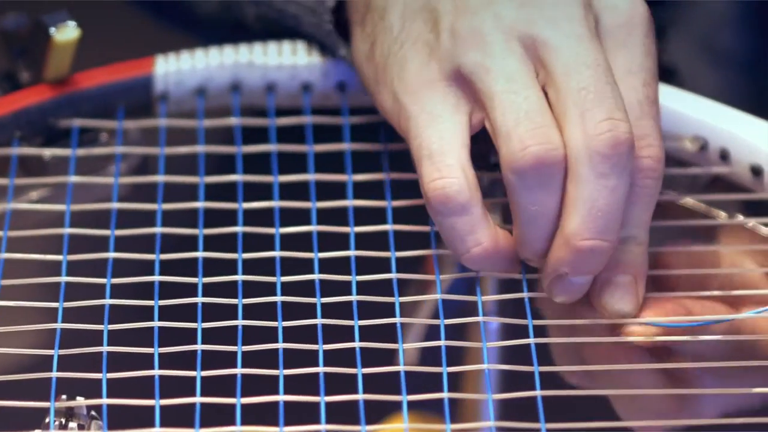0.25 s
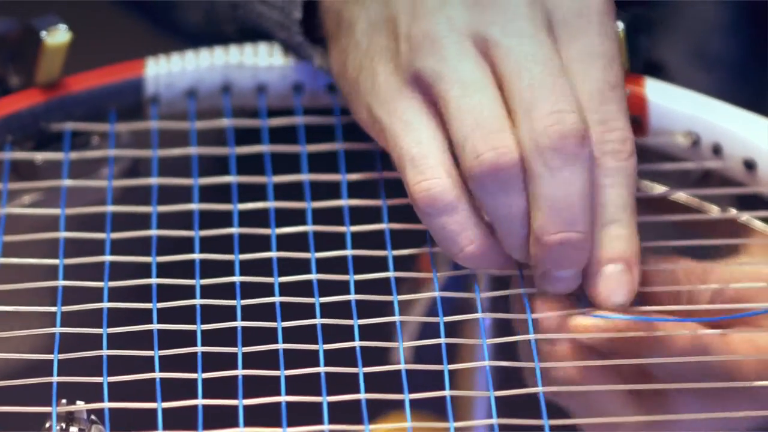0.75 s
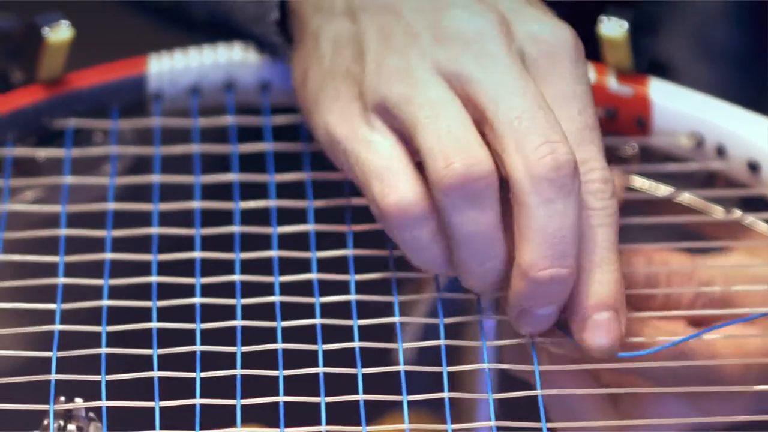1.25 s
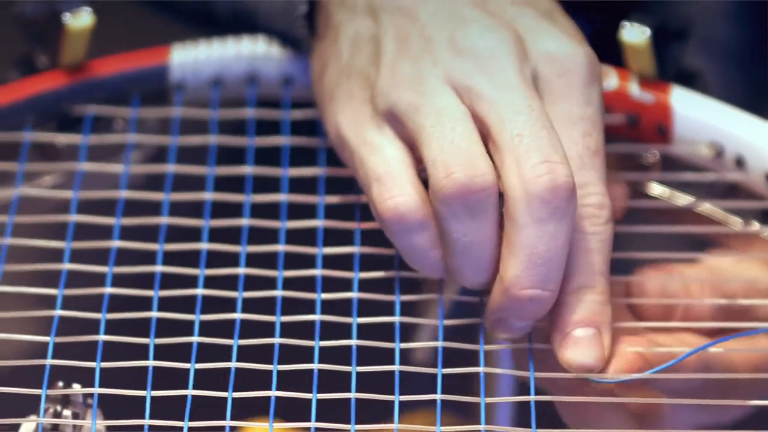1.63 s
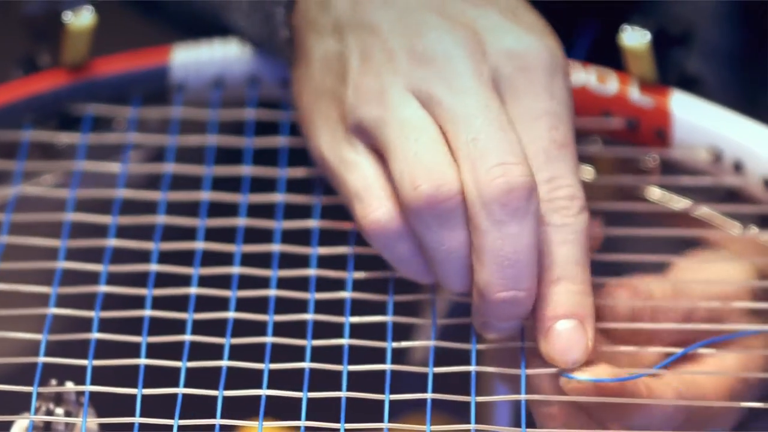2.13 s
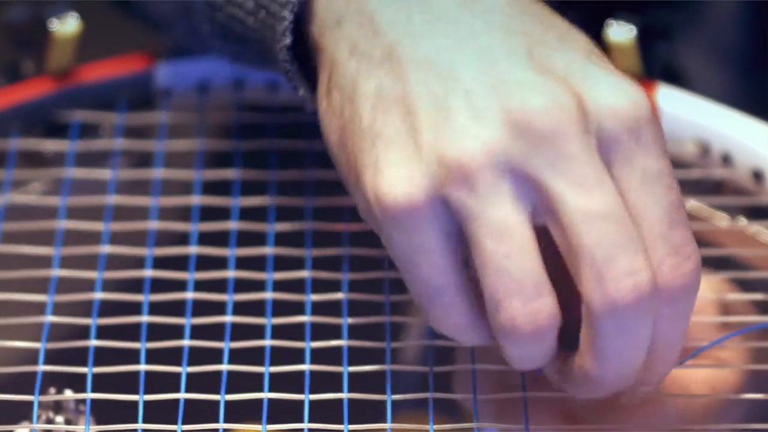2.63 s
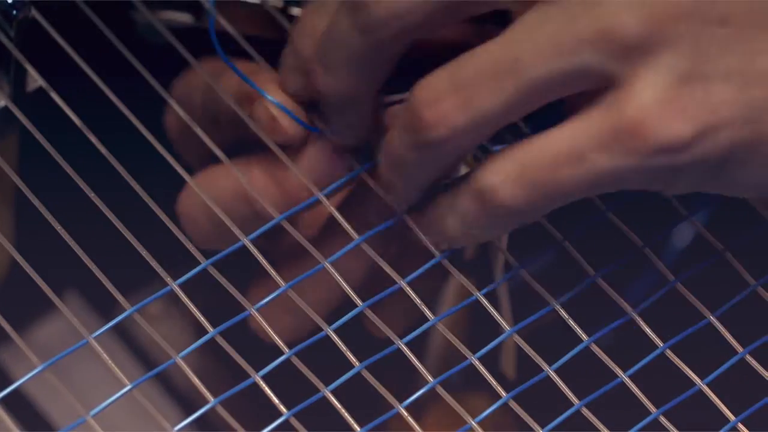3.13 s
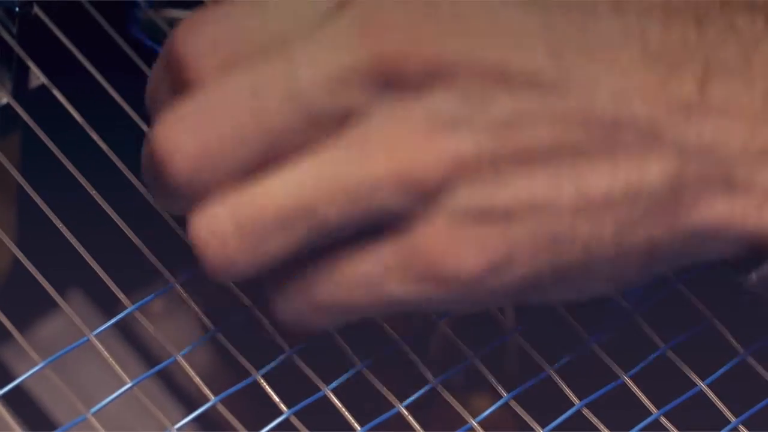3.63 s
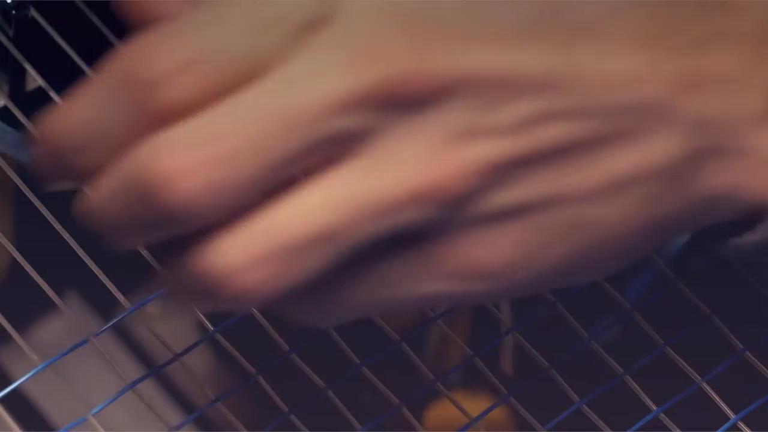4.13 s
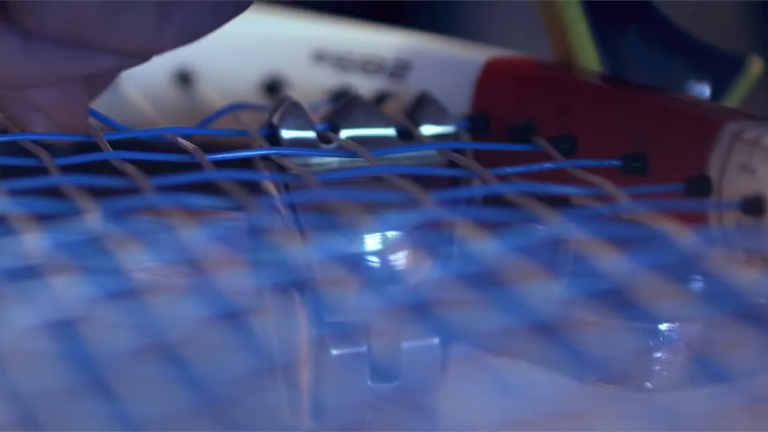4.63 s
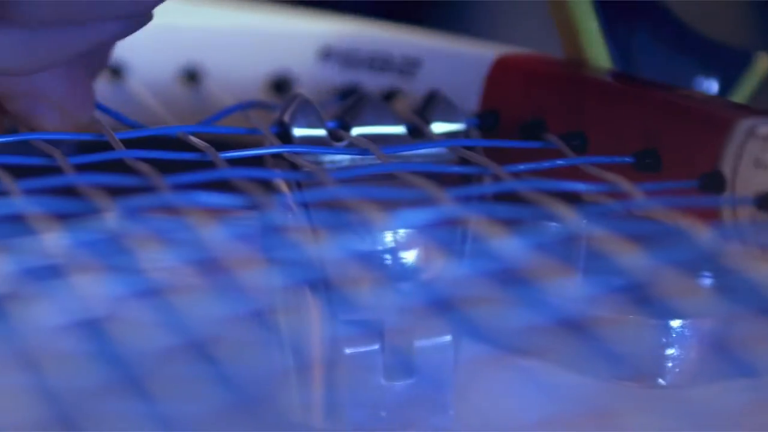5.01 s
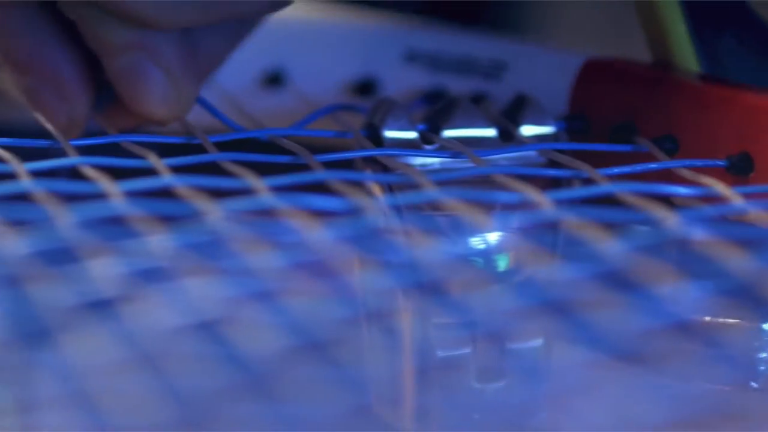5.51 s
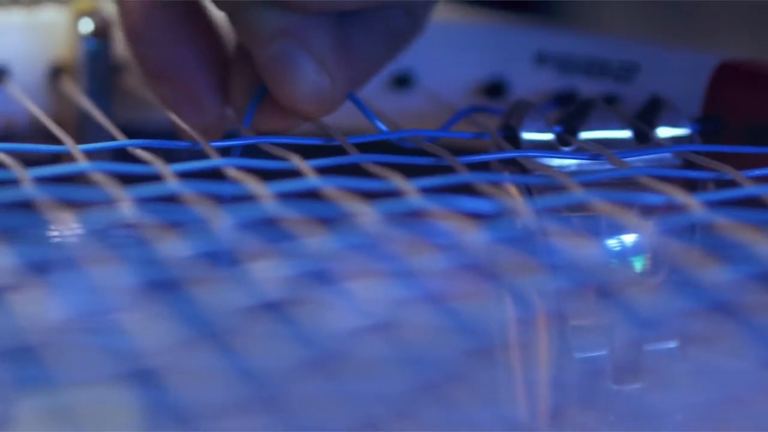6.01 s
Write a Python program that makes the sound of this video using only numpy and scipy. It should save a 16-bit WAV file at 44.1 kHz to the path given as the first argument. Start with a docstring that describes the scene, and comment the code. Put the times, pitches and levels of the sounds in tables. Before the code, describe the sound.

A tennis racquet is being strung by hand in a small, live room, heard from close by. The string snaps sharply twice as it slips over tight strings, between soft finger thuds. A heavier bump brings faint, damped string notes and light ticks, then another bright snap. Near the end a brief creak leads into a loud, resonant clack of a metal clamp. Faint rubbing, machine hum and hiss lie underneath.

```python
"""Stringing a tennis racquet

In a small, live room the cross string slips over the tight mains; each sharp snap excites the frame's
modes. Fingers rub and bump the string bed, which rings briefly, and the loose string end ticks.
Near the end the string creaks by stick-slip friction and a clamp shuts with a loud, resonant clack.
The stringing machine hums faintly over the room's hiss and rumble."""
import sys
import numpy as np
from scipy import signal
from scipy.fft import rfft, irfft, next_fast_len
from scipy.io import wavfile
from scipy.ndimage import uniform_filter1d, map_coordinates

SR = 44100
rng = np.random.default_rng(int(sys.argv[2]) if len(sys.argv) > 2 else 0)


def generate_wav(signal):
    """Clip the signal to [-1, 1] and save it as 16-bit WAV at the path in sys.argv[1]."""
    frames = np.transpose(np.atleast_2d(signal))
    scaled = np.clip(frames, -1, 1) * 32767
    pcm = np.round(scaled).astype(np.int16)
    wavfile.write(sys.argv[1], SR, pcm)


N = 275911

# Slips over a main: (time [s], level [dB], tilt [dB/octave], cut-off [Hz], longitudinal mode spacing [Hz],
# mode depth [dB], ring frequency [Hz], ring lift [dB], second slip [dB], room [dB])
SNAPS = [(0.3467, -14, 1.07, 10400, 2300, 2, 1340, 6.5, -7.5, 4.5),
         (1.7139, -6.5, 2, 9800, 1736, 4, 1380, 6, -4.5, 7),
         (3.821, -14, 3.36, 15400, 1102, 1, 5480, 6.5, 3.5, 4),
         (4.1173, -27, -.5, 13000, 1700, 0.5, 6440, 4, -11, 7.5)]
# Spectrum of the string's jolt: (frequency [Hz], gain [dB])
JOLT = [(230, 1), (520, 1), (700, -1.5), (1300, -5.5), (1650, -12), (2200, -6), (4200, 1), (7000, 2),
        (10000, 1)]
# Direct path to the listener: (frequency [Hz], gain [dB])
DIRECT_PATH = [(1000, 1.5), (4000, -2), (9000, 2.5)]
# Overall colour shared by the snaps, with a notch near 8 kHz: (frequency [Hz], gain [dB])
SNAP_COLOUR = [(60, -12.5), (240, 5), (400, -5.5), (590, 7), (790, -16.5), (1150, 0.5), (1700, 4),
               (2150, 1), (3800, -0.5), (6700, -3.5), (7900, -6), (8600, -2), (9800, 3.5), (15500, -5)]
# Frame resonances: (frequency [Hz], width [Hz], lift [dB])
FRAME_MODES = [(234, 14, 8.5), (520, 59, 5.5), (991, 42, 13), (1210, 44, 11.5), (1390, 50, 10.5),
               (1830, 55, -1), (2090, 46, 3), (2670, 93, 7.5), (2945, 49, 1)]

def snaps(lag_s=0.0062, ring_width_hz=130):
    """Impulse excitation: the string slips twice, driving its longitudinal modes and the frame."""
    out = np.zeros((2, N))
    for s, db, tilt, cutoff_hz, spacing_hz, depth_db, ring_hz, ring_db, second_db, room_db in SNAPS:
        slip = crack(t60=0.022, spread=0.48)
        add(slip, lag_s, amp(second_db) * crack(t60=0.0103, spread=1.0))
        direct = shaped(unit_energy(slip), DIRECT_PATH)
        heard = unit_energy(direct + amp(room_db) * room())
        ripple = dense_modes(spacing_hz=70, depth_db=2.8, full_hz=2500)
        modes = [*FRAME_MODES, (ring_hz, ring_width_hz, ring_db)]

        def colour(hz):
            rolloff = 10 * np.log10(1 + (hz / cutoff_hz) ** 9)
            jolt = along(JOLT, hz) + tilt * np.log2((hz + 100) / 4000) - rolloff
            ringing = longitudinal_modes(hz, spacing_hz, depth_db) + resonances(modes, hz) + ripple(hz)
            return jolt + along(SNAP_COLOUR, hz) + ringing
        add(out, s, amp(db) * coloured(heard, colour))
    return out

def longitudinal_modes(hz, spacing_hz, depth_db):
    """Standing waves along a short span of string give evenly spaced peaks, in dB."""
    peaks = ((1 - np.sin(2 * np.pi * hz / spacing_hz)) / 2) ** 2
    return depth_db * (2 * peaks - 1)

# The clamp catches, slams and rebounds: (time [s], body level [dB], treble level [dB])
CLACKS = [(5.4691, -14, -28.5), (5.4908, 1, 1), (5.512, -8.5, -4)]
# Spectrum of the clean first push: (frequency [Hz], gain [dB])
STRIKE = [(310, 6), (450, 6), (620, 4), (800, 4), (1500, 2.5), (2800, -2.5), (5000, -7.5)]
# Response of the clamp on its base: (frequency [Hz], gain [dB])
CLAMP = [(50, -15), (200, 5), (320, 8), (480, 15), (780, 5.5), (1450, 17), (1700, 13), (3000, 10.5),
         (3800, 3), (5300, 0.5), (5900, -3), (7800, 2), (9000, 6.5), (12000, 6.5), (15000, -15)]
# Their resonances: (frequency [Hz], width [Hz], lift [dB])
CLAMP_MODES = [(313, 10, 16), (359, 10, 12), (437, 12, 8), (466, 10, 12), (520, 24, 5), (614, 11, 10),
               (842, 9, 15), (942, 16, 8), (1143, 12, 9), (1211, 15, 8), (1287, 26, 7), (1383, 14, 4),
               (1430, 16, 7), (1497, 16, 4), (1595, 14, 6), (1896, 20, 5), (2129, 12, 9), (2740, 24, 5),
               (2953, 20, 7), (3043, 20, 7), (3200, 24, 6), (4650, 50, 6), (5200, 110, 10), (6540, 36, 9),
               (7770, 40, 6), (8470, 110, 7), (8841, 22, 10), (8965, 22, 8), (9520, 50, 5), (11368, 30, 8)]
# Directivity: (frequency [Hz], leftward bias [dB])
CLAMP_SIDE = [(300, -0.5), (600, -2), (1200, 0), (2600, 1.8), (5000, 0)]

def clamp(strike_db=-7, chatter_db=-8, room_db=-4.5, pan_db=0.7):
    """Modal ringing after impact: each contact, a clean strike plus chatter, excites the same modes."""
    out, sides = np.zeros((2, N)), np.array([[1], [-1]])
    ripple = dense_modes(spacing_hz=35, depth_db=2.4, full_hz=3500)
    body = lambda hz: along(CLAMP, hz) + resonances(CLAMP_MODES, hz) + ripple(hz)
    radiated = lambda hz: body(hz) + sides * along(CLAMP_SIDE, hz)
    strike = shaped(bending_pulse(delay_s=0.00219), STRIKE)
    for s, body_db, treble_db in CLACKS:
        contact = amp(strike_db) * strike + amp(chatter_db) * crack(t60=0.062, spread=0.58)
        heard = amp(sides * pan_db) * contact + amp(room_db) * room()
        hardness = [(900, body_db), (8000, treble_db)]
        add(out, s, coloured(heard, lambda hz: radiated(hz) + along(hardness, hz)))
    return out

def bending_pulse(delay_s):
    """Dispersion of bending waves in metal: the highs arrive first, 1 kHz after delay_s."""
    hz = np.fft.rfftfreq(SR, 1 / SR)
    return irfft(np.exp(-4j * np.pi * delay_s * np.sqrt(hz * 1000)), SR)

# Finger contacts: (time [s], thud level [dB], slap level [dB], room in the thud [dB])
BUMPS = [(0.157, -10.5, -46, -34), (0.885, -17.5, -51, 3), (1.412, -19.5, -58, 0.5),
         (2.474, 0.5, -18.5, -2.5), (2.548, -20, -50, -1), (2.683, -15.5, -38, 0), (2.832, -16, -33.5, -7)]
# Slap on the strings: (frequency [Hz], gain [dB])
SLAP = [(150, -26), (500, 9), (900, -0.5), (1300, -3.5), (2000, -54), (5000, -43)]
# Thud through the frame: (frequency [Hz], gain [dB])
THUD = [(40, -17), (100, -5.5), (170, -6.5), (310, 2), (420, -14.5), (600, -31), (1200, -62), (3000, -48)]

def bumps(lead_s=0.0043, slap_room_db=-16.5):
    """Soft impact favours low frequencies: a fingertip slaps the strings, then the frame thuds."""
    out = np.zeros((2, N))
    for s, thud_db, slap_db, room_db in BUMPS:
        slap = crack(t60=0.082, spread=0.44) + amp(slap_room_db) * room()
        thud = crack(t60=0.043, spread=0.9) + amp(room_db) * room()
        add(out, s - lead_s, amp(slap_db) * shaped(slap, SLAP))
        add(out, s, amp(thud_db) * shaped(thud, THUD))
    return out

# Spectrum of the creak: (frequency [Hz], gain [dB])
CREAK = [(300, -4), (1100, 3), (2500, -4), (4700, -4.5), (5600, -27.5), (15000, -28.5)]
# Resonances of the clamped string: (frequency [Hz], width [Hz], lift [dB])
CREAK_MODES = [(1240, 53, 16), (1470, 70, 4), (1900, 55, 15), (2405, 50, 13), (3040, 90, 11.5),
               (3900, 70, 9.5), (4600, 60, 12)]

def creak(start_s=5.2487, level_db=-33, count=11, slips_per_s=205, loss_db=1.3, jitter=0.1, room_db=-3):
    """Stick-slip friction: a short run of uneven, fading jerks rings the clamped string."""
    out, run = np.zeros((2, N)), np.zeros((2, SR))
    for k, offset in enumerate(jitter * rng.standard_normal(count)):
        add(run, (k + offset) / slips_per_s, amp(-loss_db * k) * crack(t60=0.0071, spread=0.33))
    heard = unit_energy(run) + amp(room_db) * room()
    colour = lambda hz: along(CREAK, hz) + resonances(CREAK_MODES, hz)
    add(out, start_s, amp(level_db) * coloured(heard, colour))
    return out

# The weave passes a main: (time [s], level [dB], pitch [Hz])
PLUCKS = [(2.682, -56, 513), (2.916, -55, 473), (3.0736, -44, 465.6), (3.237, -49.5, 466),
          (3.394, -57.5, 474), (3.59, -53.5, 471), (4.425, -63, 609)]
# One string scuffs another: (frequency [Hz], gain [dB])
SCUFF = [(200, -2), (520, 7.5), (800, -6.5), (2300, -24.5), (3000, -11), (3800, -29), (12000, -47)]

def plucks(t60=0.12, attack_s=0.0038, room_db=-14, pan_db=-1.0, scuff_db=19):
    """Damped free vibration: with a soft scuff, the string bed sounds one note that the hand damps."""
    out, t = np.zeros((2, N)), np.arange(SR) / SR
    for s, db, hz in PLUCKS:
        envelope = amp(db - 60 * t / t60) * (1 - np.exp(-t / attack_s))
        ring = envelope * np.sin(2 * np.pi * hz * t)
        walls = signal.fftconvolve(ring[None], room(gap_s=0.038), axes=1)[:, :SR]
        scuff = amp(db + scuff_db) * shaped(crack(t60=0.1, spread=0.4) + room(), SCUFF)
        add(out, s, ring * amp([[pan_db], [-pan_db]]) + amp(room_db) * walls + scuff)
    return out

# Taps of the string end: (time [s], relative level [dB], room [dB])
TICKS = [(2.6766, -58.5, 4), (3.2175, -66, 3.5), (3.6492, -62.5, 1.5), (3.7306, -62.5, -1),
         (3.7897, -63.5, -8), (4.7945, -66.5, -1), (5.1736, -72, -9)]
# Spectrum of a tap: (frequency [Hz], gain [dB])
TICK = [(1000, -25), (2200, -15), (2800, -1), (3600, -7), (7800, -13.5), (8900, -1), (9600, 7.5),
        (10400, 5), (11800, 0), (15000, -15)]

def ticks(gain_db=22):
    """Brief contact favours high frequencies: the loose string end taps the weave."""
    out = np.zeros((2, N))
    for s, db, room_db in TICKS:
        tap = crack(t60=0.019, spread=0.7) + amp(room_db) * room()
        add(out, s, amp(db + gain_db) * shaped(tap, TICK))
    return out

# Pulls through the weave: (start [s], length [s], rub level [dB], hiss level [dB])
PULLS = [(0, 0.47, -82.5, -85), (.66, 0.31, -72, -83), (0.956, 0.065, -69.5, -80), (1.17, 0.45, -74, -103),
         (2.113, .08, -71, -96), (2.277, 0.53, -69, -75.5), (3.018, .06, -79, -80), (3.353, .35, -83, -100),
         (4.335, 0.067, -73, -78), (5.707, 0.75, -66, -88.5)]
# Rubbing noise: (frequency [Hz], relative density [dB])
RUB = [(300, 4.5), (700, -2.5), (1400, 1.5), (2400, -4), (4500, -6), (7000, -12.5), (9000, -21.5)]
# Treble hiss, also part of the background: (frequency [Hz], relative density [dB])
HISS = [(5000, -28), (8000, -9), (9500, 7.5), (12000, -3), (15000, -5)]
# The string squeaks past the frame: (time [s], level [dB], pitch [Hz])
SQUEAK = [(5.75, -110, 2560), (5.88, -78, 2420), (6.02, -78, 2404), (6.15, -81, 2330), (6.26, -86, 2340)]

def pulls(attack_s=0.05, release_s=0.34, sag_db_per_s=19.5, grain_db=0.7, grain_hz=90, flutter_hz=100):
    """Sliding friction: an uneven rub fades as each pull slows; the squeak is narrow-band noise."""
    t, rub, hiss = np.arange(N) / SR, np.zeros(N), np.zeros(N)
    for s, length, rub_db, hiss_db in PULLS:
        stroke = gate(s, s + length, attack_s, release_s) * amp(-sag_db_per_s * np.maximum(t - s, 0))
        rub = np.maximum(rub, amp(rub_db) * stroke)
        hiss = np.maximum(hiss, amp(hiss_db) * stroke)
    grip = unit(amp(grain_db * wander(grain_hz)))
    squeak_db, hz = curves(SQUEAK)
    lowpass = signal.butter(2, flutter_hz, fs=SR, output="sos")
    flutter = signal.sosfilt(lowpass, diffuse(N) + 1j * diffuse(N))
    squeak = unit(np.real(flutter * np.exp(2j * np.pi * np.cumsum(hz) / SR)))
    return grip * (rub * diffuse(N, RUB) + hiss * diffuse(N, HISS) + amp(squeak_db) * squeak)

# Partials of the machine's hum: (frequency [Hz], relative level [dB])
HUM_LINES = [(300.6, 0), (400, -14), (598, -21), (797, -22)]

def hum(level_db=-71.5, waver_rad=0.073, waver_hz=7, gap_s=(2.87, 4.63), fade_s=0.015):
    """A line spectrum with slight phase modulation: a steady hum, cut off abruptly for a stretch."""
    t = np.arange(N) / SR
    drift = waver_rad * wander(waver_hz)
    tone = sum(amp(db) * np.sin(2 * np.pi * hz * t + drift) for hz, db in HUM_LINES)
    audible = 1 - gate(*gap_s, fade_s, fade_s)
    return amp(level_db) * audible * unit(tone)

# Swell of the low rumble: (time [s], level [dB])
RUMBLE_LEVEL = [(0.0, -81.5), (0.94, -79), (1.43, -77.5), (2.74, -69), (3.69, -73.5), (4.09, -76),
                (4.63, -81.5), (5.7, -71.5), (5.87, -72), (6.26, -68)]
# Spectrum of the rumble: (frequency [Hz], relative density [dB])
RUMBLE = [(30, -18.5), (90, 0.5), (220, 5), (450, -2), (900, -14.5), (3000, -67)]
# Room air: (frequency [Hz], relative density [dB])
AIR = [(25, -1.5), (80, 1.5), (220, -4), (450, -4), (700, -12.5), (1100, -13.5), (2500, -18), (6800, -23),
       (7900, -27), (9300, -21.5), (12000, -21), (15500, -26.5)]

def room_noise(air_db=-73.5, hiss_db=-87):
    """Diffuse ambient noise: a low rumble swells and sinks under steady air and hiss."""
    rumble = amp(curves(RUMBLE_LEVEL)[0]) * diffuse(N, RUMBLE)
    return rumble + amp(air_db) * diffuse(N, AIR) + amp(hiss_db) * diffuse(N, HISS)

# Decay of the room: (frequency [Hz], reverberation time [s])
ROOM_T60 = [(100, 0.55), (400, 0.49), (1400, 0.46), (5000, 0.45), (9000, 0.42), (14000, 0.27)]

def room(gap_s=0.0038, build_s=0.0044):
    """Reverberation: a fresh tail of energy 1 builds up after a gap and decays band by band."""
    hz, t, bands = signal.stft(diffuse(SR), SR, nperseg=256)
    decay = amp(-60 * t / along(ROOM_T60, hz)[:, None])
    tail = signal.istft(bands * decay, SR, nperseg=256)[1][:, :SR]
    tail *= 1 - np.exp(-np.maximum(np.arange(SR) / SR - gap_s, 0) / build_s)
    return unit_energy(tail)

# Sound arriving from all sides: (frequency [Hz], left-right coherence [0-1])
COHERENCE = [(30, 0.35), (120, 0.87), (350, 0.93), (700, 0.53), (1300, 0.037), (4000, 0.12), (12000, 0.5)]

def diffuse(size, spectrum=None):
    """A diffuse field: stereo noise of rms 1, more coherent in the bass than in the treble."""
    m = next_fast_len(size, True)
    hz = np.fft.rfftfreq(m, 1 / SR)
    angle = np.arccos(np.clip(along(COHERENCE, hz), -1, 1)) / 2
    gain = amp(along(spectrum, hz)) if spectrum else 1
    noise = rfft(rng.standard_normal((2, m))) * gain
    mid, side = irfft(noise * [np.cos(angle), np.sin(angle)], m)[:, :size]
    return unit(np.array([mid + side, mid - side]))

def crack(t60, spread, size=4096):
    """Contact chatter: a decaying noise burst of energy 1, whitened to an even spectrum."""
    decay = amp(-60 * np.arange(size) / SR / t60)
    burst = (rng.standard_normal(size) + spread * diffuse(size)) * decay
    power = np.mean(np.abs(rfft(burst, 2 * size)) ** 2, 0)
    smoothed = np.abs(uniform_filter1d(power, size=50))
    even = coloured(burst, lambda hz: -10 * np.log10(smoothed + 1e-9))
    return unit_energy(np.pad(even, ((0, 0), (0, SR - size))))

def resonances(modes, hz):
    """Modal superposition: the gain in dB of summed Lorentzian peaks."""
    peaks = sum((amp(db) - 1) / (1 + (2 * (hz - f) / width) ** 2) for f, width, db in modes)
    return 20 * np.log10(np.abs(1 + peaks) + 1e-6)

def dense_modes(spacing_hz, depth_db, full_hz):
    """Modal overlap: many small modes make a random ripple in dB that deepens up to full_hz."""
    knots = rng.standard_normal(4096)
    ripple = lambda hz: np.interp(hz / spacing_hz, np.arange(len(knots)), knots)
    return lambda hz: depth_db * np.minimum(hz / full_hz, 1) * ripple(hz)

def coloured(x, colour):
    """Minimum-phase filtering: a causal response whose gain in dB is colour(hz)."""
    n = x.shape[-1]
    gain = amp(colour(np.fft.rfftfreq(2 * n, 1 / SR)))
    cepstrum = irfft(np.log(gain + 1e-6))
    cepstrum[..., 1:n] *= 2
    cepstrum[..., n + 1:] = 0
    return irfft(rfft(x, 2 * n) * np.exp(rfft(cepstrum)))[..., :n]

def shaped(x, spectrum):
    """Causal filtering by a table of gains."""
    return coloured(x, lambda hz: along(spectrum, hz))

def along(points, hz):
    """Interpolation on a logarithmic frequency axis."""
    f, values = np.transpose(points)
    return np.interp(np.log(hz + 1), np.log(f), values)

def curves(rows):
    """Linear interpolation in time, one curve for each later column."""
    s, *columns = np.transpose(rows)
    return [np.interp(np.arange(N) / SR, s, c) for c in columns]

def wander(rate_hz):
    """Smooth random modulation."""
    return map_coordinates(rng.standard_normal(N), [np.arange(N) * rate_hz / SR])

def gate(start, end, attack, release):
    """A trapezoidal envelope: opens from start, closes after end."""
    t = np.arange(N) / SR
    return np.clip((t - start) / attack, 0, 1) * np.clip(1 - (t - end) / release, 0, 1)

def add(track, s, sound):
    """Superposition of a sound on the track at time s."""
    part = track[:, max(round(s * SR), 0):][:, :sound.shape[-1]]
    part += sound[..., :part.shape[1]]

def amp(db):
    return 10 ** (np.asarray(db) / 20)

def unit(x):
    return x / np.sqrt(np.mean(x ** 2) + 1e-20)

def unit_energy(x):
    """Normalisation of a one-second sound to energy 1."""
    return unit(x) / np.sqrt(SR)

def scene():
    """Linear superposition of all sources."""
    return snaps() + ticks() + creak() + clamp() + bumps() + plucks() + pulls() + hum() + room_noise()

def record(dry, top_hz=15650):
    """Band limiting: an ideal low-pass filter removes everything above top_hz."""
    m = next_fast_len(N + SR // 2, True)
    return irfft(rfft(dry, m) * (np.fft.rfftfreq(m, 1 / SR) < top_hz), m)[:, :N]

dry = scene()
out = record(dry)
generate_wav(out)
```